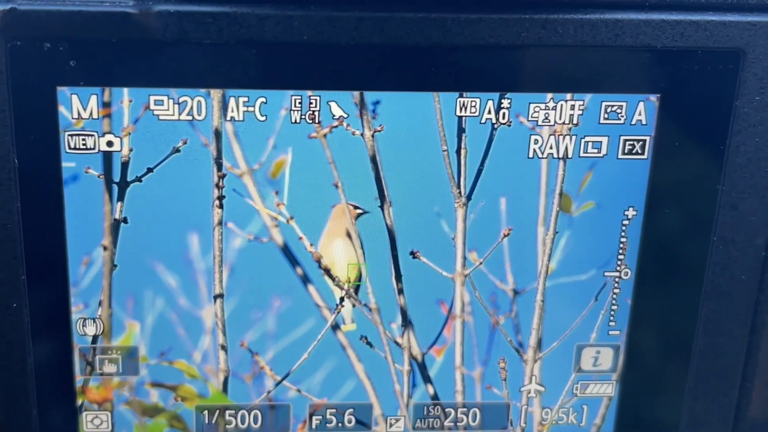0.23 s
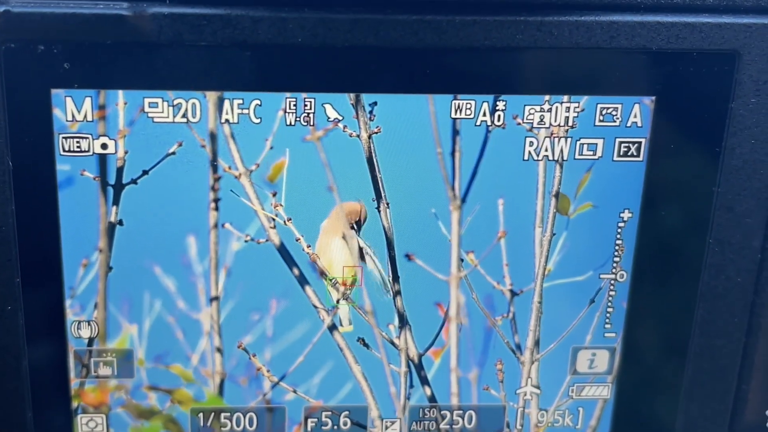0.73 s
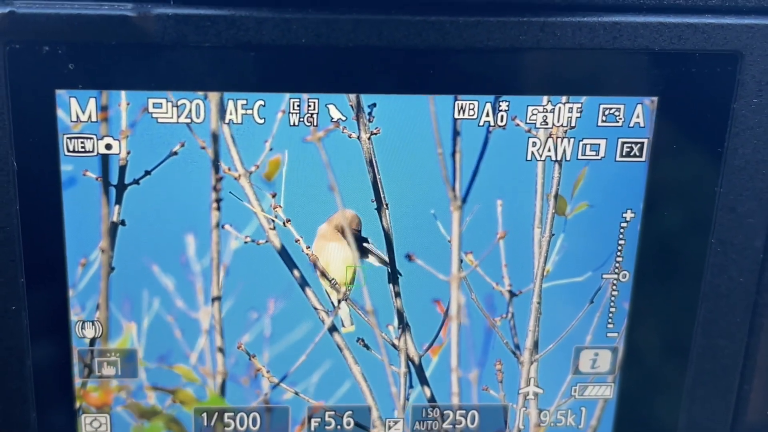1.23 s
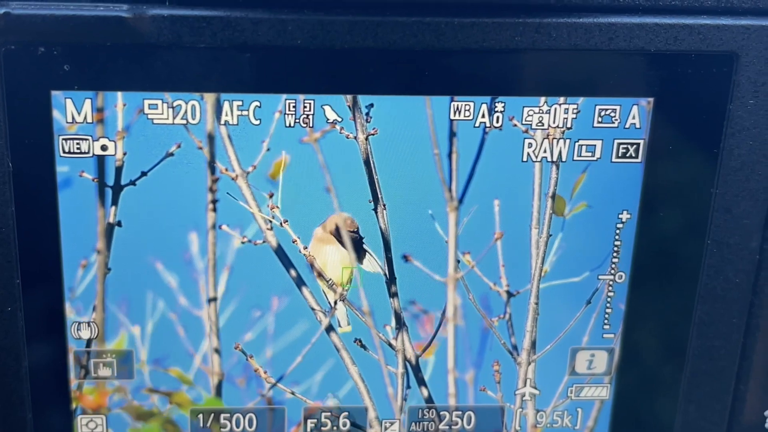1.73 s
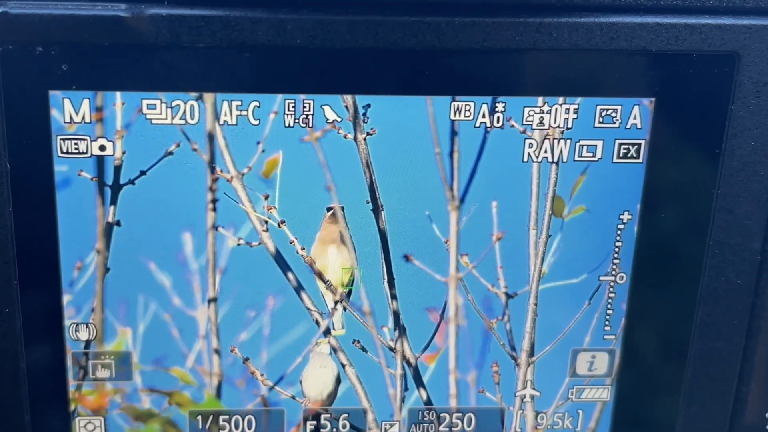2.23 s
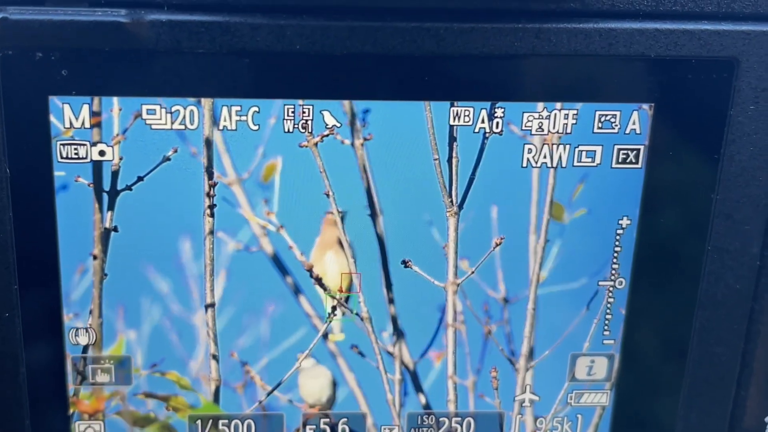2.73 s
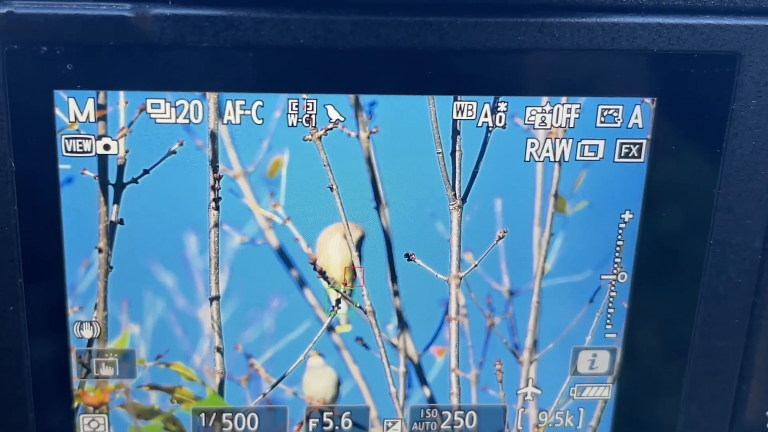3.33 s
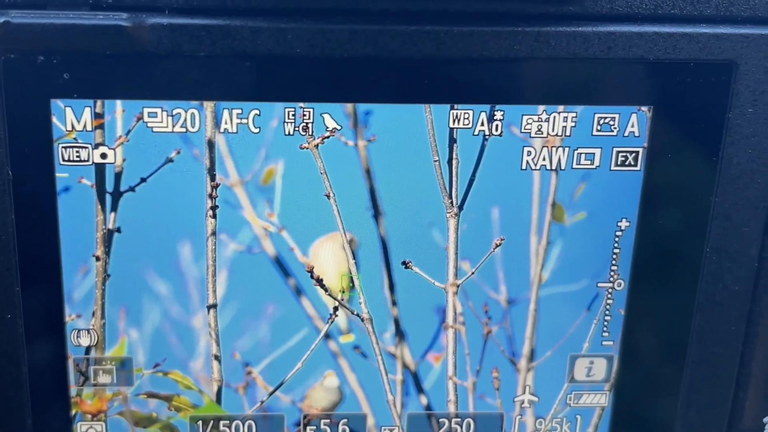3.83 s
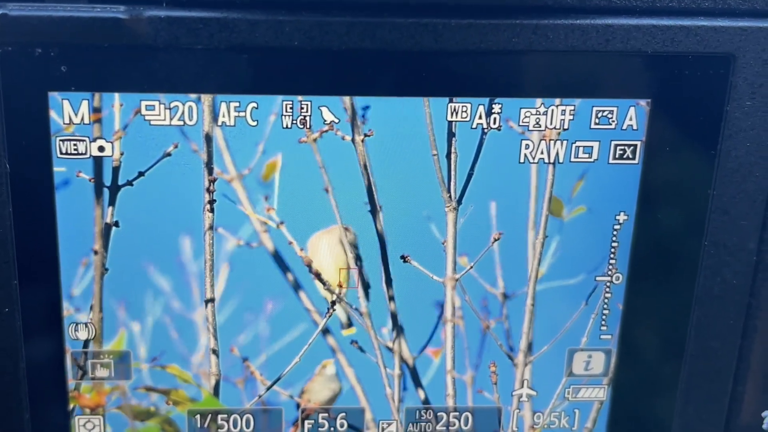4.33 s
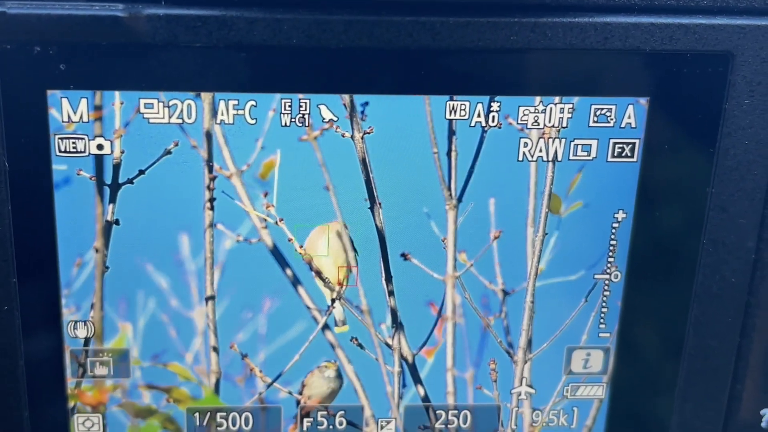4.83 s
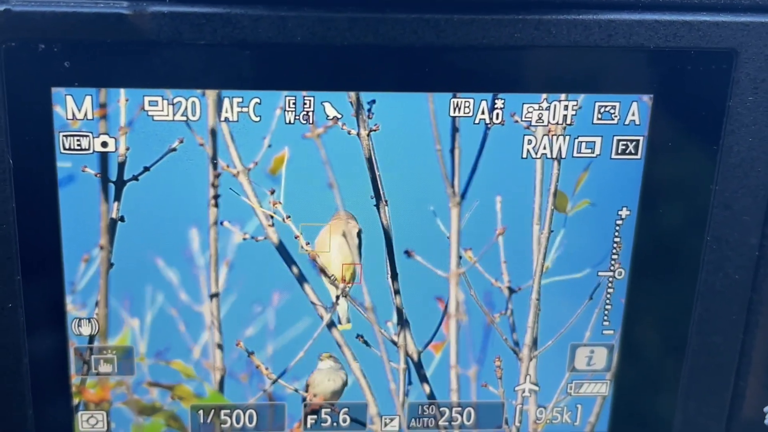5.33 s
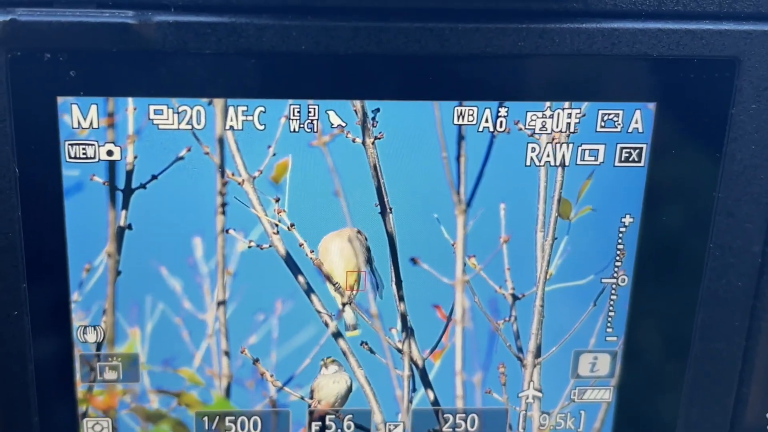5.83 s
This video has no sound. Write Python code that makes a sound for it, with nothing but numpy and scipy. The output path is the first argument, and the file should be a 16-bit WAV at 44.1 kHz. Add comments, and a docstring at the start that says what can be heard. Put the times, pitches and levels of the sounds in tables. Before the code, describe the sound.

Throughout, distant traffic lies under everything: an even low engine drone, slightly stronger in the first second, a soft road roar that drifts up and down, and faint tyre hiss. Very faint high insect rasps flick by near 0.4, 1.9, 2.9, 3.4, 3.9 and 4.9 s. At 1.3-1.5 s comes the clearest call, a thin, very high buzzy whistle sliding down, holding, then flicking upward. Dry ticks and tiny chips follow around 1.7 s. Weaker, hoarser calls cluster at 2.1-2.3 s, with small chirps at 2.4-2.7. A sharp twig tick snaps at 3.0 s. Chirps at 3.4 precede another thin whistle at 3.6-3.75. A faint tick comes at 4.3, a soft call at 4.5-4.7, chirps at 4.9, and very faint calls at 5.7 and 5.95 s. Branches scatter the sounds briefly.

```python
"""Bare trees within earshot of a road: cedar waxwings give thin, high, buzzy whistles.
Each call is a gliding tone plus a higher, partly hoarse voice; decaying noise is its scatter off the branches.
Farther songbirds whistle arched tones and chip in narrow-band noise, twigs tick as short damped rings,
and an insect rasps faintly in swells of very high noise. Under it all lies distant traffic:
three bands of noise for engines, road and tyres, picked up by two close microphone ports."""
import sys
import numpy as np
from scipy import signal
from scipy.fft import rfft, irfft, next_fast_len
from scipy.io import wavfile
from scipy.ndimage import uniform_filter1d, map_coordinates

SR = 44100
rng = np.random.default_rng(int(sys.argv[2]) if len(sys.argv) > 2 else 0)


def inscribe(sig):
    """Save sig as 16-bit PCM at rate SR to the path in sys.argv[1].

    A 1-D sig is mono; a 2-D sig holds one channel per row.
    Samples are clipped to [-1, 1] before scaling.
    """
    pcm = np.round(np.clip(np.atleast_2d(sig).T, -1, 1) * 32767)
    wavfile.write(sys.argv[1], SR, pcm.astype(np.int16))


N = 268216
T = np.arange(N) / SR  # seconds

# Level of the engine drone over time: start_s, level_db
ENGINE_LEVEL = [(0, -41.5), (.8, -42), (1.8, -45), (3.8, -44), (5.2, -44.5), (6.08, -44)]
# Level of the road roar over time, before its small random drift: start_s, level_db
ROAD_LEVEL = [(0, -45), (.6, -46.5), (1.1, -45), (1.65, -42.5), (2.15, -43.5), (2.6, -46), (3.15, -43.5),
              (3.65, -42), (4.1, -43.3), (4.6, -43.5), (5.1, -44), (5.6, -46), (5.9, -42)]
# Relative spectrum of the engine drone: freq_hz, density_db (per Hz)
DRONE_SPECTRUM = [(20, -39.5), (35, -22), (48, -4.5), (66, -1.5), (82, -7), (105, -14.5), (150, -32),
                  (300, -84.5)]
# Relative spectrum of the road roar: freq_hz, density_db (per Hz)
ROAR_SPECTRUM = [(70, -35), (120, -6), (170, -1.5), (222, 0), (280, -4), (350, -11.5), (400, -4.5),
                 (455, -1.5), (510, -7.5), (560, -14.5), (660, -10.5), (960, -15), (1250, -26.5),
                 (2000, -76)]
# Relative spectrum of the tyre hiss: freq_hz, density_db (per Hz)
TYRE_SPECTRUM = [(600, -5), (1200, 4), (1480, 5.5), (2150, -4.5), (2600, -9.5), (3100, -10.5),
                 (3700, -23.5), (5200, -27), (6300, -24.5), (7600, -28), (9800, -26.5), (11000, -29.5),
                 (12200, -37), (13500, -51)]
# Far sound at the two ports: freq_hz, likeness (0-1), left_lead_rad, left_over_right_db
FAR_PORTS = [(60, .99, -.1, -1.9), (130, .95, .1, -2.3), (220, .97, .65, -1.1), (440, .88, 1.05, -.8),
             (620, .35, 2.3, -2.6), (900, .42, 3.45, -4.8), (1300, .76, 2.9, -.3), (1900, .7, 1.2, .6),
             (2600, .45, -1.7, .3), (3600, .4, -3, -1.5), (5500, .25, -2.6, -1.5), (7600, .4, -2.2, -.5),
             (8500, .85, -.1, -.5), (9400, .75, 1.5, -.5), (10350, .95, 3.14, 0), (11100, .65, 4.4, 0),
             (11750, .85, 6.2, 0)]
# Decay of the scatter among the trees: freq_hz, t60_s
TREE_DECAY = [(2000, 0.14), (5000, 0.3), (9000, 0.25)]
# Insect rasps: peak_s, half_length_s (from the peak to 17 dB down), level_db (at the peak)
INSECT_RASPS = [(0.353, .03, -82), (0.437, 0.04, -71.5), (1.884, .04, -79), (1.966, 0.039, -71.5),
                (2.922, 0.044, -78), (3.42, 0.065, -79), (3.946, 0.065, -72.5), (4.885, 0.074, -82),
                (5.414, 0.15, -86)]
# Relative spectrum of the rasp: freq_hz, level_db
RASP_SPECTRUM = [(6500, -37), (7600, -23), (8270, -12), (8950, -0.5), (9650, 4), (10350, -7.5),
                 (11000, -10), (12000, -16), (13000, -29)]
# Waxwing calls: start_s, end_s, attack_s, start_hz, held_hz, slide_s (time constant), closing_rise_hz,
# buzz_depth_hz, level_db, fade_db (over the call), second_voice_above_hz, second_voice_db (against the first),
# closing_handover_db (towards the second voice), left_over_right_db, hoarseness (0-1, share of power)
WAXWING_CALLS = [ (1.316, 1.479, .019, 10200, 7480, .012, 400, 30, -51.3, 0, 790, -5.5, 3, 4.5, 0),
                 (2.072, 2.125, 0.031, 9400, 7420, 0.016, 0, 45, -60.5, -2.5, 618, -10, -2, -4, 0.13),
                 (2.117, 2.215, .012, 7500, 7230, 0.0288, 0, 70, -60, 11, 746, -9, 0, -2, 0.4),
                 (2.138, 2.176, .008, 8970, 7730, .014, 0, 110, -64.5, -2, 500, -16, 0, -1, .2),
                 (2.232, 2.262, .01, 8850, 7580, 0.013, 5, 60, -70, -2, 550, -14, 1, 0, 0.1),
                 (3.607, 3.728, 0.027, 9300, 7390, 0.016, 92, 35, -62.5, 0.5, 1100, -9.5, -4, -4.5, 0.1),
                 (3.721, 3.766, 0.0082, 9300, 8000, 0.0066, 400, 70, -67, 2, 595, -7, -3, 0, .5),
                 (4.519, 4.651, 0.031, 8100, 6530, .06, 60, 70, -64.5, 3, 790, -20, 6, -2, 0.3),
                 (4.644, 4.683, .008, 8760, 7750, 0.0084, 0, 160, -71, 7, 500, -12, 0, -1, .5),
                 (5.683, 5.742, 0.011, 7900, 7150, 0.015, -2, 60, -72.5, 10, 900, -21, -2, -3, .1),
                 (5.749, 5.786, .012, 7950, 7480, 0.0073, -1, 90, -75, 4, 500, -15, 0, -3, 0.2),
                 (5.96, 6.013, .014, 8400, 7150, .024, 0, 70, -72.5, 6, 900, -20, 0, -2, .1)]
# Upward flicks of pitch within and at the end of calls: peak_s, rise_hz
PITCH_FLICKS = [(1.387, 129), (1.416, 706), (1.45, 1500), (1.477, 650), (3.689, 473), (3.724, 700),
                (3.76, 400), (4.646, 480), (4.681, 1100)]
# Waxwing calls at the two ports: freq_hz, left_lead_rad, left_over_right_db
WAXWING_PORTS = [(7500, -2.5, -1.5), (7960, -2.1, -4), (8540, -1.5, 1.5), (9000, 1.3, -5), (9700, 1.7, 1)]
# Dry ticks, as of twigs, three rings each (levels before the decay):
# start_s, low_hz, low_level_db, middle_hz, middle_level_db, high_hz, high_level_db
TWIG_TICKS = [(1.6854, 2330, -49, 4650, -58, 6150, -55.5), (1.69, 2400, -65, 4800, -65, 6150, -63),
              (1.705, 2300, -64, 4750, -72, 6100, -63), (3.0098, 2200, -41.5, 4100, -60, 4900, -62),
              (3.1245, 2300, -67, 4050, -67, 4870, -70), (4.304, 2280, -55, 3360, -57, 4000, -76),
              (4.792, 4250, -75, 5400, -76, 6400, -71), (5.421, 6050, -70, 7900, -68, 8800, -70)]
# Arched songbird notes: start_s, length_s, middle_pitch_hz, end_drop_hz,
# climb_hz (middle to end), level_db (in the middle)
BIRD_WHISTLES = [(2.37, 0.024, 3160, 50, 650, -71), (2.395, 0.025, 4050, 120, 30, -72),
                 (2.413, 0.017, 4350, 300, -50, -77.5), (2.6, .036, 5600, 302, -70, -78),
                 (2.713, .012, 4700, 400, 300, -72), (3.143, .054, 6500, 205, 4, -84),
                 (3.391, .018, 3500, 120, 600, -73), (3.411, 0.026, 4090, 40, 0, -74),
                 (3.45, 0.016, 3950, -62, -120, -79), (4.89, .02, 5150, 50, 599, -81),
                 (4.911, .023, 4160, 130, 0, -70), (4.933, .014, 4060, -100, 60, -66)]
# Hoarse songbird chips: peak_s, centre_hz, width_hz,
# half_length_s (from the peak to 17 dB down), level_db (at the peak)
BIRD_CHIPS = [(1.7, 6100, 260, 0.0122, -76), (1.719, 6280, 200, .009, -70), (1.73, 6150, 240, 0.012, -79),
              (1.747, 2530, 295, 0.036, -76), (1.783, 4380, 484, 0.025, -76.5),
              (1.785, 6550, 450, 0.024, -83), (2.428, 3630, 650, 0.037, -80), (2.726, 3880, 750, .01, -75),
              (3.080, 4230, 500, .012, -81), (3.331, 3820, 400, .022, -81), (3.57, 4500, 1300, 0.024, -86),
              (4.538, 3950, 450, .011, -83), (4.97, 4050, 300, .05, -88), (5.13, 4300, 150, 0.051, -93),
              (5.437, 8360, 700, 0.02, -81)]

TOP_HZ = 12900  # band limit of the recorder
TYRE_DB = -66
# Shape of a waxwing call
HOOK_S, RELEASE_S, FLICK_S = .065, .006, .003  # closing rise, fade-out, width scale of a flick
PULSE_DB, PULSE_PER_S = 1.8, 110  # uneven throb: size and random knots a second
FLICK_DB_PER_HZ = -0.0073  # the tone thins as it flicks up
SMEAR_HZ, SMEAR_LIFT_HZ = 450, 223.7  # a hoarse first voice spreads this wide, mostly above its pitch
CALL_ECHO_DB = -10
# The second voice of a waxwing call
SECOND_FOLLOWS = 0.48  # share of the slide and flicks that it follows
SECOND_END_HZ = 8770  # its target in a closing rise, before slide, flicks and wander
WANDER_HZ = 70
RASP_DB, HIGH_RASP_DB = -14, -17  # hoarse parts on its pitch and just above
RASP_DB_PER_HZ = 0.0002  # its hoarse parts grow in a flick
# Twig ticks
TICK_RISE_S, TICK_T60_S = .0006, .011
CRACK_DB = -7.5  # the snap against the low ring
REBOUND_S, REBOUND_DB = .0033, -9
WHISTLE_END_DB = -3.5  # the ends of a songbird note against its middle


def amp(db):
    """Decibels to gain."""
    return 10 ** (np.asarray(db) / 20)


def unit(x):
    """Scale to rms 1."""
    return x / np.sqrt(np.mean(x ** 2) + 1e-20)


def along(points, hz):
    """Read each column of a table by frequency, on a log axis."""
    freq_hz, *columns = np.transpose(points)
    log_hz, log_freq = np.log(hz + 1), np.log(freq_hz)
    return np.squeeze([np.interp(log_hz, log_freq, column) for column in columns])


def level_curve(rows):
    """Read a table of times and levels at every sample."""
    start_s, level_db = np.transpose(rows)
    return np.interp(T, np.sort(start_s), level_db)


def wobble(rate, size):
    """A smooth random curve with this rate of knots a second."""
    knots = rng.standard_normal(size + 4)
    return map_coordinates(knots, [np.arange(size) * rate / SR])


def filtered(x, response):
    """Shape a sound by a complex response of frequency."""
    m = next_fast_len(N + 8192)
    hz = np.fft.rfftfreq(m, 1 / SR)
    return irfft(rfft(x, m) * response(hz), m)[..., :N]


def placed(x, lead, pan_db):
    """A source off to one side reaches the ports at different phases and levels."""
    half = amp(pan_db / 2) * np.exp(.5j * lead)
    return filtered(x, lambda hz: np.array([[half], [1 / half]]))


def among_trees(x, lead, pan_db, echo_db):
    """Direct sound plus a dense scatter from trunks and branches, different at each port."""
    noise = rng.standard_normal((2, SR // 2))
    hz, t, grains = signal.stft(noise, SR, nperseg=256)
    decay = amp(-60 * t / along(TREE_DECAY, hz)[:, None])
    tail = signal.istft(grains * decay, SR, nperseg=256)[1]
    tail = tail / np.linalg.norm(tail[0])
    tail = np.pad(tail, ((0, 0), (SR // 100, 0)))  # scatter starts 10 ms late
    scatter = signal.fftconvolve(np.atleast_2d(x), tail, axes=1)[:, :N]
    return placed(x, lead, pan_db) + amp(echo_db) * scatter


def note_span(s, length):
    """Sample numbers of one note, the time since its start and a gate with soft ends."""
    i = np.arange(int(s * SR), min(N, int((s + length) * SR)))
    return i, T[i] - s, signal.windows.tukey(len(i), .06)


def swell_at(t, half_length):
    """A bell-shaped swell that is 17 dB down half_length from its peak."""
    return np.exp(-2 * (t / half_length) ** 2)


def syrinx(hz, buzz_hz, swing_hz, jitter_hz, flutter_db):
    """A pure tone of rms 1 whose pitch and strength tremble with a fast, slightly uneven buzz."""
    size = len(hz)
    buzz_rate = buzz_hz * (1 + 0.095 * wobble(60, size))
    buzz = np.sin(2 * np.pi * np.cumsum(buzz_rate) / SR)
    pitch = hz + swing_hz * buzz + jitter_hz * wobble(500, size)
    tone = np.sin(2 * np.pi * np.cumsum(pitch) / SR)
    return unit(tone * amp(flutter_db * (buzz + wobble(160, size))))


def hoarse(hz, width_hz):
    """An irregular vibration of rms 1: a tone smeared over a narrow band around the pitch curve."""
    size = len(hz)
    band = wobble(2 * width_hz, size) + 1j * wobble(2 * width_hz, size)
    return unit(np.real(band * np.exp(2j * np.pi * np.cumsum(hz) / SR)))


def far_noise(spectrum):
    """Stereo noise whose mid has rms 1: part arrives from one side, part from all around."""
    m = next_fast_len(N + 8192)
    hz = np.fft.rfftfreq(m, 1 / SR)
    alike, lead, pan_db = along(FAR_PORTS, hz)
    alike, side = np.clip(alike, 0, 1), np.array([[.5], [-.5]])
    noise = rfft(rng.standard_normal((3, m)))
    from_side = np.sqrt(alike) * noise[2] * np.exp(1j * side * lead)
    all_around = np.sqrt(1 - alike) * noise[:2]
    colour = amp(along(spectrum, hz) + side * pan_db)
    pair = irfft((from_side + all_around) * colour, m)[:, :N]
    return pair / np.std(pair.mean(axis=0))


def traffic():
    """Engines drone at the bottom, the road roars above them and tyres leave a dull hiss."""
    drone = far_noise(DRONE_SPECTRUM)
    # engines run evenly, without long lulls
    slow_power = abs(uniform_filter1d(drone.mean(axis=0) ** 2, SR // 4))
    drone /= (slow_power + 1e-6) ** .5
    roar = amp(level_curve(ROAD_LEVEL) + 0.4 * wobble(6, N)) * far_noise(ROAR_SPECTRUM)
    hiss = amp(TYRE_DB + 0.6 * wobble(8, N)) * far_noise(TYRE_SPECTRUM)
    return amp(level_curve(ENGINE_LEVEL)) * drone + roar + hiss


def insect():
    """Each wing stroke drags a file over a scraper: a short swell of very high, uneven noise."""
    stroke = sum(amp(db) * swell_at(T - s, half_length) for s, half_length, db in INSECT_RASPS)
    teeth = rng.standard_normal(N) * amp(3.5 * wobble(400, N))
    rasp = unit(filtered(teeth, lambda hz: amp(along(RASP_SPECTRUM, hz))))
    side = np.array([[.5], [-.5]])
    pair = filtered(stroke * rasp, lambda hz: np.exp(1j * side * along(FAR_PORTS, hz)[1]))
    return among_trees(pair, lead=0, pan_db=0, echo_db=-14)


def waxwings():
    """One side of the syrinx glides to a held pitch, with flicks and closing rises; the other sings above."""
    out, side = np.zeros((2, N)), np.array([[.5], [-.5]])
    for (s, end, attack_s, start_hz, held_hz, slide_s, rise_hz, depth_hz, db, fade_db,
         above_hz, second_db, handover_db, pan_db, rough) in WAXWING_CALLS:
        length = max(end - s, .01)
        i, t, gate = note_span(s, length)

        hook = np.clip(1 - (length - t) / HOOK_S, 0, 1)
        slide_hz = (start_hz - held_hz) * np.exp(-t / slide_s)
        flick_hz = sum(up_hz / np.cosh(np.clip((T[i] - at) / FLICK_S, -20, 20))
                       for at, up_hz in PITCH_FLICKS)
        hz = held_hz + slide_hz + flick_hz + rise_hz * hook
        upper_hz = held_hz + above_hz + SECOND_FOLLOWS * (slide_hz + flick_hz)
        upper_hz += WANDER_HZ * wobble(70, len(i))
        if rise_hz > 100:  # only a marked closing rise carries the second voice along
            upper_hz += hook * (SECOND_END_HZ - held_hz - above_hz)

        swell = np.clip(t / attack_s, 0, 1) ** 2 * np.clip((length - t) / RELEASE_S, 0, 1)
        throb_db = PULSE_DB * wobble(PULSE_PER_S, len(i))
        effort = swell * amp(db - fade_db * t / length + throb_db)

        first = syrinx(hz, buzz_hz=340, swing_hz=depth_hz, jitter_hz=depth_hz / 2, flutter_db=.8)
        rough = np.clip(rough, 0, 1)
        smear = hoarse(hz + SMEAR_LIFT_HZ, SMEAR_HZ)
        first = np.sqrt(1 - rough) * first + np.sqrt(rough) * smear

        second = syrinx(upper_hz, buzz_hz=340, swing_hz=50, jitter_hz=50, flutter_db=1.4)
        rasp = amp(RASP_DB) * hoarse(upper_hz, width_hz=700)
        rasp += amp(HIGH_RASP_DB) * hoarse(upper_hz + 800, width_hz=600)
        second = second + amp(RASP_DB_PER_HZ * flick_hz) * rasp

        shift_db = handover_db * hook / 2
        voice = amp(-shift_db) * first + amp(second_db + shift_db) * second
        out[:, i] += gate * effort * amp(FLICK_DB_PER_HZ * flick_hz + side * pan_db) * voice

    def at_ports(hz):
        """Phase and level of the calls at each port."""
        lead, pan_db = along(WAXWING_PORTS, hz)
        return np.exp(1j * side * lead) * amp(side * pan_db)

    return among_trees(filtered(out, at_ports), lead=0, pan_db=0, echo_db=CALL_ECHO_DB)


def twigs():
    """Each tick is a dull snap with three short rings; the twig springs back once, sounding its low ring."""
    out = np.zeros(N)
    for s, *rings in TWIG_TICKS:
        i, t, _ = note_span(s, .05)
        hz, db = np.array(rings[::2]), np.array(rings[1::2])
        fade = np.clip(t / TICK_RISE_S, 0, 1) * amp(-60 * t / TICK_T60_S)
        ring = amp(db)[:, None] * np.sin(2 * np.pi * hz[:, None] * t)
        crack = amp(db[0] + CRACK_DB) * hoarse(np.full(len(i), hz[0]), .38 * hz[0])
        out[i] += fade * (ring.sum(axis=0) + crack)
        out[i + int(REBOUND_S * SR)] += amp(REBOUND_DB) * fade * ring[0]
    return among_trees(out, lead=-0.24, pan_db=0.5, echo_db=-12)


def songbirds():
    """Farther birds sing small arched, buzzing tones and short chips of narrow-band noise."""
    notes, chips = np.zeros((2, N))
    for s, length, middle_hz, drop_hz, climb_hz, db in BIRD_WHISTLES:
        i, t, gate = note_span(s, length)
        u = 2 * t / length - 1  # -1 at the start, 0 in the middle, 1 at the end
        arch_hz = middle_hz + climb_hz * u - drop_hz * u ** 2
        tone = syrinx(arch_hz, buzz_hz=148, swing_hz=30, jitter_hz=70, flutter_db=2.5)
        notes[i] += gate * amp(db + WHISTLE_END_DB * u ** 2) * tone
    for s, hz, width_hz, half_length, db in BIRD_CHIPS:
        i = np.flatnonzero(abs(T - s) < 2 * half_length)
        chips[i] += amp(db) * swell_at(T[i] - s, half_length) * hoarse(np.full(len(i), hz), width_hz)
    notes = among_trees(notes, lead=-2.1, pan_db=2.2, echo_db=-13)
    return notes + among_trees(chips, lead=-0.24, pan_db=-2.0, echo_db=-3.0)


def scene():
    """Birds, twigs and insect over the far road."""
    return traffic() + insect() + waxwings() + twigs() + songbirds()


def record(dry):
    """The recorder keeps nothing above its band limit."""
    return filtered(dry, lambda hz: hz < TOP_HZ)


dry = scene()
out = record(dry)
inscribe(out)
```